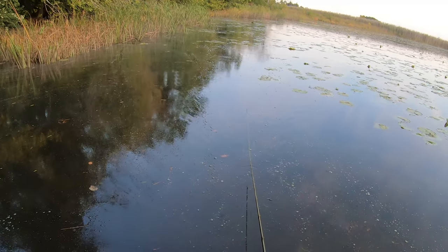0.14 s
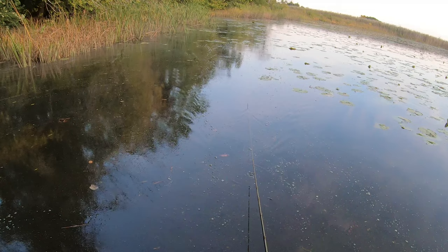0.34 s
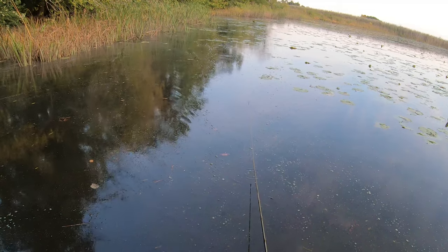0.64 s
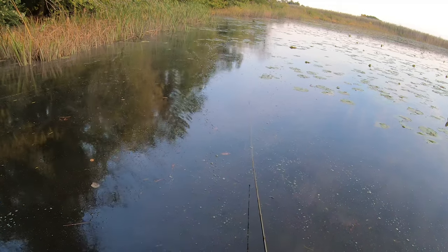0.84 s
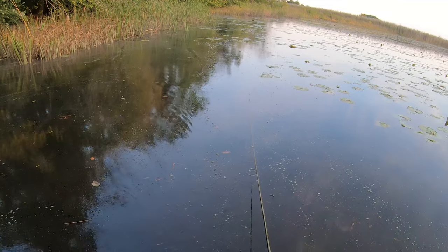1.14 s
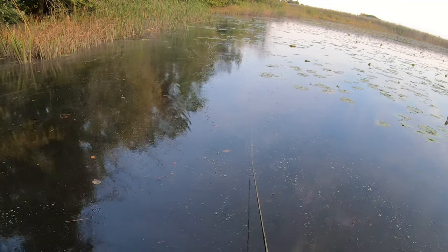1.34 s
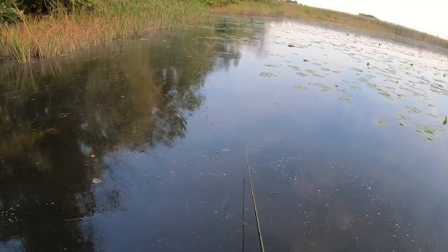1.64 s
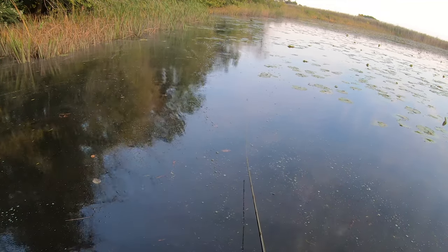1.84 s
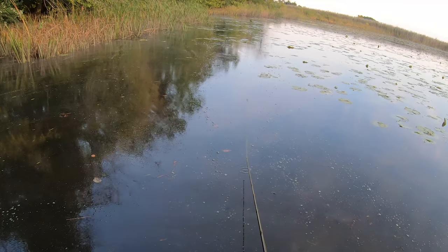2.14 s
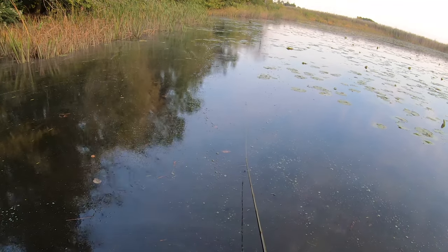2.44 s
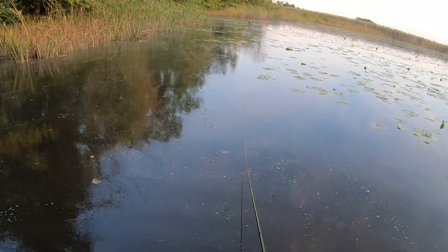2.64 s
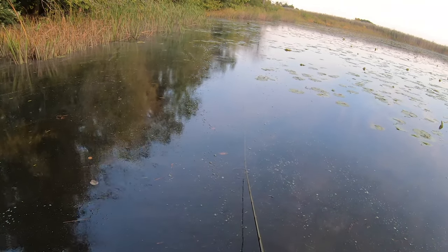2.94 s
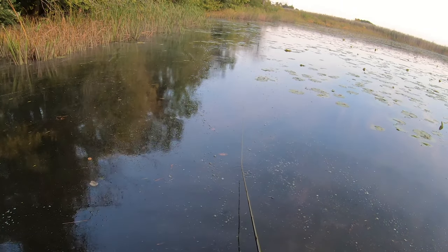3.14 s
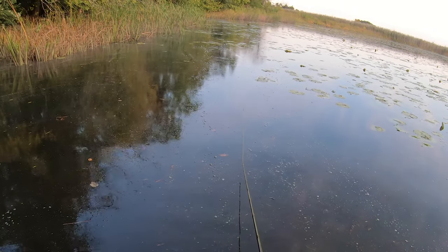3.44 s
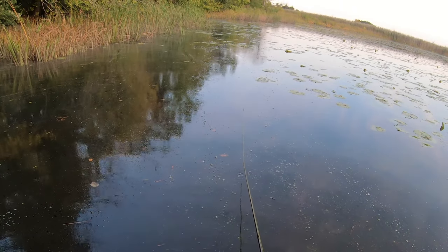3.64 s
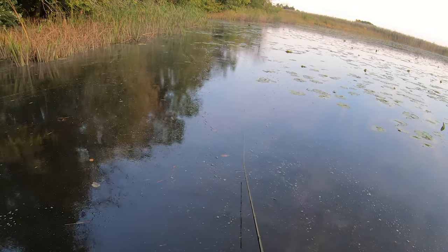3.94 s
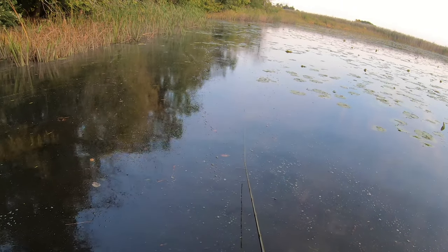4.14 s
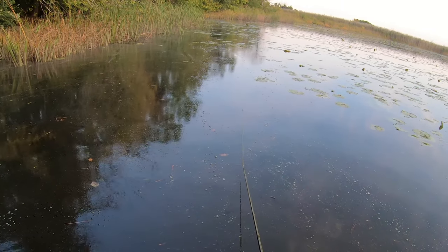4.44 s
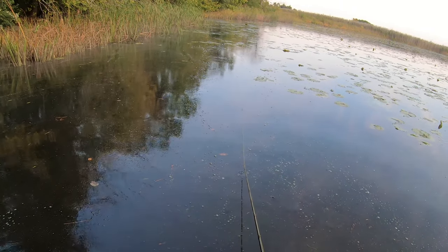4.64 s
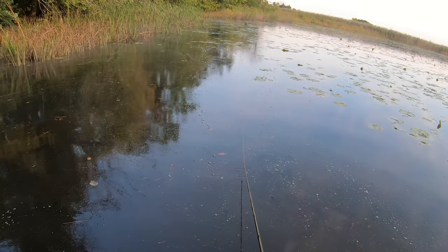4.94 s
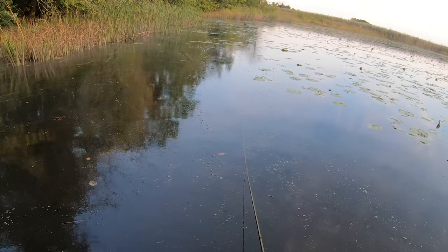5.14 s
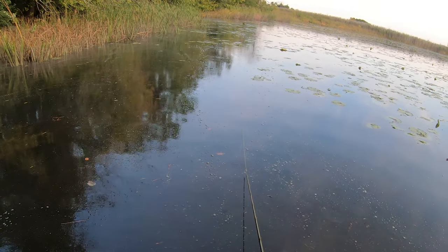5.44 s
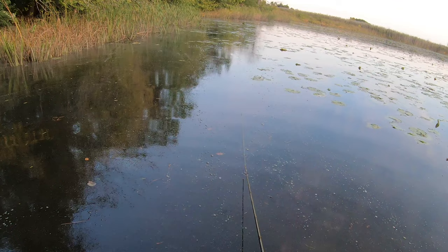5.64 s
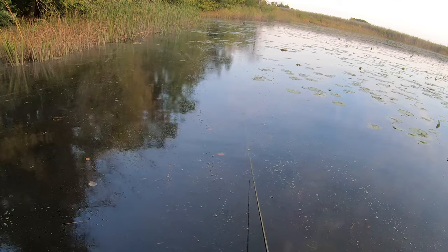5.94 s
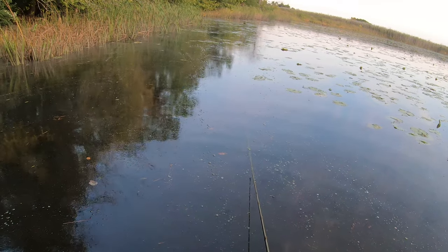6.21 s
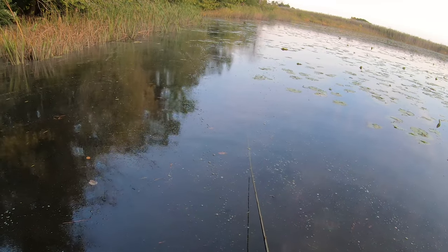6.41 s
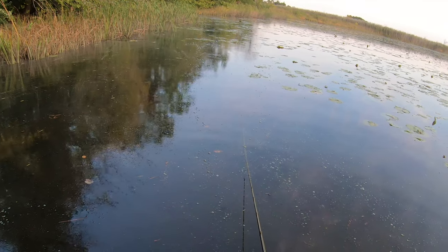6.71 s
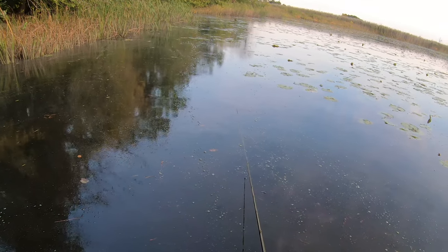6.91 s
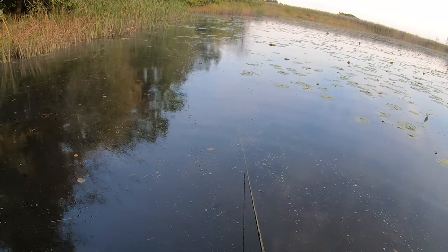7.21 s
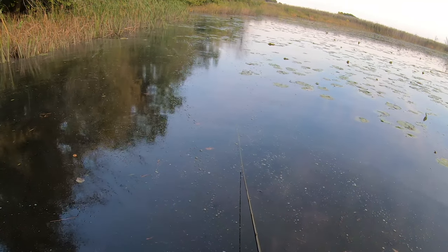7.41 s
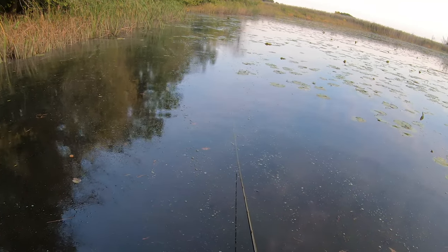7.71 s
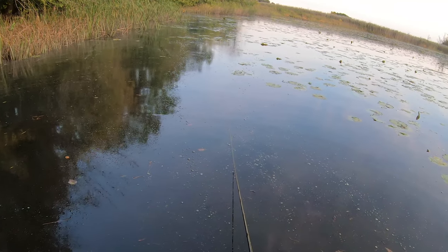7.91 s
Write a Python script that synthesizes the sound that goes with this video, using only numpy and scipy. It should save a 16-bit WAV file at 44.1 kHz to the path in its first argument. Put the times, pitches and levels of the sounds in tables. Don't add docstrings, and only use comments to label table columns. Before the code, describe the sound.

Beside a reedy pond, high crickets trill without pause while lower field crickets chirp in turn. A distant bird gives a falling rattle nearly every second, softened by echoes from the trees. Faint croaks, thin whistles and sharp chips come between. Small hard ticks cluster near two and a half seconds, and wind buffets the left around five. Low road rumble lies beneath, heard in wide stereo on a small camera microphone.

```python
import sys
import numpy as np
from scipy import signal
from scipy.fft import rfft, irfft
from scipy.io import wavfile
from scipy.ndimage import uniform_filter1d

SR = 44100
rng = np.random.default_rng(int(sys.argv[2]) if len(sys.argv) > 2 else 0)


def amplitude_ratio(level_db):
    exponent = np.asarray(level_db, float) / 20
    return 10 ** exponent


def to_wav(s):
    ch = np.atleast_2d(s).T
    pcm = np.round(np.clip(ch, -1, 1) * 32767)
    wavfile.write(sys.argv[1], SR, pcm.astype(np.int16))


N = 355875
T = np.arange(N) / SR
HZ = np.fft.rfftfreq(N, 1 / SR)
SIDE = np.array([[.5], [-.5]])  # left, right share of a pan in dB

# start_s, length_s, pitch_hz, level_db
FIELD_CHIRPS = [(-.02, 0.38, 4320, -61), (.74, 0.28, 4485, -50), (0.801, 0.32, 4405, -56.5),
                (1.92, .27, 4367, -54), (2.15, 0.34, 4526, -53.5), (2.42, .31, 4440, -51.5),
                (3.2, 0.28, 4454, -56.5), (3.33, 0.21, 4320, -59), (3.36, 0.24, 4670, -59.5),
                (3.68, 0.27, 4454, -56.5), (4.12, 0.23, 4510, -56), (4.35, 0.26, 4480, -52.5),
                (4.7, 0.33, 4325, -57), (4.8, 0.31, 4440, -62), (5.2, 0.25, 4565, -57.5),
                (5.45, 0.28, 4460, -59), (5.95, .15, 4400, -57), (6.16, 0.28, 4470, -54.5),
                (6.2, 0.27, 4310, -56), (6.39, 0.26, 4540, -56.5), (6.76, 0.3, 4456, -55.5),
                (7.22, 0.26, 4463, -56), (7.5, 0.33, 4560, -58), (7.85, .28, 4470, -56)]
# start_s, length_s, level_db
HIGH_CHIRPS = [
    (1.465, 0.26, -51),
    (3.125, 0.24, -52.5),
    (4.9, 0.284, -55),
]
# start_s, length_s, level_db
LOW_CHIRPS = [(.1, .3, -68), (1.03, 0.33, -70), (1.9, .25, -72), (2.95, 0.22, -62), (4.15, 0.31, -62),
              (6.25, 0.28, -65), (7.47, .16, -67)]
# start_s, length_s, level_db
CROAKS = [(-.05, 0.24, -60), (.96, 0.22, -62), (1.77, 0.24, -62.5), (2.58, 0.17, -62), (3.39, 0.21, -65),
          (3.72, 0.16, -72), (4.26, 0.2, -60.5), (5.14, 0.22, -64.5), (5.4, 0.16, -70), (5.92, 0.22, -63.5),
          (6.79, 0.28, -64.5), (7.63, 0.22, -63)]
# start_s, level_db, time_stretch
RATTLE_CALLS = [(.1, -54.5, 0.93), (.87, -52.5, 0.85), (1.58, -52, 0.93), (2.47, -53, 0.86),
                (3.27, -53.5, 0.84), (4.09, -53.5, 0.92), (5.04, -56, 0.91), (5.91, -53.5, 0.89),
                (7.0, -54.5, 0.92), (7.791, -55, 0.84)]
# age_s, pitch_hz, level_db
RATTLE_FALL = [(0, 3540, -11.5), (.025, 3480, -5), (.07, 3270, -6), (.15, 3100, -4.5), (.22, 2920, -5),
               (.255, 2645, -6), (.31, 2610, -3.5), (.34, 2560, -17)]
# start_s, length_s, level_db
WHISTLE_NOTES = [(1.35, .115, -59), (1.625, .13, -57), (1.909, 0.1, -56), (2.196, .12, -59.5),
                 (5.508, .11, -60.5), (5.777, .115, -59), (6.061, .12, -57), (6.357, .1, -58)]
# start_s, from_hz, to_hz, level_db, left_minus_right_db
BIRD_CHIPS = [
    (3.738, 8440, 7650, -46.5, 14),
    (4.323, 2830, 3720, -46.5, -9),
    (6.882, 4650, 5300, -54, 0),
    (6.995, 4650, 5340, -55, 2),
    (7.101, 4640, 5500, -56, 2),
    (7.217, 5000, 5900, -58, 6),
    (7.32, 4800, 5600, -55, 1),
]
# start_s, length_s, pitch_hz, level_db, left_minus_right_db
BURRED_NOTES = [
    (.805, 0.024, 3070, -56, -7),
    (3.0, 0.031, 2960, -62, 0),
    (.63, 0.12, 3000, -62.5, -3),
    (6.95, .05, 1950, -61, -6),
    (4.215, .03, 3600, -55, -2),
    (7.682, 0.031, 3050, -50.5, -5),
]
# start_s, length_s, from_hz, to_hz, level_db
BUBBLE_NOTES = [
    (7.473, 0.0223, 2300, 3970, -53),
    (7.491, 0.0106, 2860, 4010, -44),
    (7.563, 0.031, 2320, 3920, -54),
]
# start_s, peak_db, ring_hz, left_minus_right_db
TICK_HITS = [(.700, -36, 2240, -3), (1.724, -49, 3600, 6), (2.4305, -32.5, 1250, -17),
             (2.437, -31, 700, -14), (2.533, -28.5, 3300, 1.5), (3.223, -38, 5640, 3),
             (4.218, -39, 2200, 6), (6.778, -49, 5000, -1), (6.1965, -26, 2600, -7),
             (7.1977, -28, 1733, -7.5), (7.415, -38, 1810, -1), (7.99, -39, 1899, -6)]
# start_s, held_s, level_db
WIND_GUSTS = [
    (4.97, 0.46, -23.5),
    (5.45, .2, -36),
    (6.6, .17, -38.5),
]
# freq_hz, density_db_per_hz
ROAD_SPECTRUM = [(12, -37.5), (20, -23), (59, 1), (111, -2.5), (146, 0.5), (221, -7.5), (260, -15.5),
                 (295, -14.5), (329, -20.5), (360, -22.5), (447, -30.5), (555, -34), (742, -24), (972, -31),
                 (1500, -37), (1950, -51), (3300, -120)]
# centre_hz, width_hz, level_db
ENGINE_DRONES = [
    (303, 18, -56.5),
    (356.5, 8.6, -56),
]
# freq_hz, density_db_per_hz
CHORUS_SPECTRUM = [(900, -39.5), (1200, -10), (2040, -15.5), (3430, -15), (3800, -11), (4380, -2),
                   (5580, -14.5), (6470, -3.5), (7300, -7), (8300, -8.5), (8480, -14), (8850, -27),
                   (9400, -35), (9800, -51.5)]
# time_s, level_db
ROAD_HAZE = [(0, -1), (1.3, -0.5), (2.4, 3), (3.2, 0), (4, -1), (6.2, -2), (6.8, 0.5), (8.07, 1.5)]
# freq_hz, shared_fraction
PORT_LIKENESS = [(60, .96), (120, .98), (250, .94), (400, .8), (520, .3), (1000, .35), (2200, .45),
                 (4500, .4), (9000, .5)]
# freq_hz, left_lead_rad
PORT_LEAD = [(1, 0), (350, -.2), (520, -1.2), (950, -3.3), (1550, -3.6), (1900, -6), (2600, -6.5),
             (4300, -5.7), (5250, -4.6), (7150, -4), (8300, -2.5)]
# freq_hz, left_minus_right_db
PORT_TILT = [(60, 1), (100, -1), (180, -0.5), (320, -0.5), (560, -1), (980, -4.5), (1710, -1.5), (2980, -2),
             (5210, 4), (9110, -1)]
# start_s, length_s, highest_hz
TREBLE_FLICKERS = [(.02, .06, 10300), (.17, .05, 10500), (.62, .13, 10800), (.9, .11, 10600),
                   (1.11, .08, 11800), (1.37, .05, 10100), (1.69, .06, 11000), (2.05, .08, 12500),
                   (2.13, .16, 10200), (2.49, .07, 10500), (2.76, .08, 10500), (2.9, .1, 10900),
                   (3.17, .04, 10800), (3.5, .11, 11000), (3.8, .08, 10200), (3.99, .25, 10600),
                   (4.58, .21, 10400), (4.85, .18, 10600), (5.07, .12, 11100), (5.4, .1, 10300),
                   (5.55, .08, 12200), (5.75, .04, 10100), (6.08, .08, 10200), (6.26, .21, 11200),
                   (6.5, .55, 11000), (6.75, .32, 12900), (7.16, .06, 10200), (7.6, .13, 10200),
                   (7.82, .25, 10800)]


def level(x, db):
    return x * amplitude_ratio(db) / np.sqrt(np.mean(x ** 2))


def curves(rows, at=T):
    s, *columns = np.transpose(rows)
    return [np.interp(at, s, c) for c in columns]


def over_hz(rows):
    hz, value = np.transpose(rows)
    return np.interp(np.log(HZ + 1), np.log(hz + 1), value)


def walk(rate_hz):
    k = int(SR / rate_hz)
    held = np.repeat(rng.standard_normal(N // k + 1), k)
    return 1.3 * uniform_filter1d(uniform_filter1d(held, k), k)[:N]


def tone(hz):
    return np.sqrt(2) * np.sin(2 * np.pi * np.cumsum(hz) / SR)


def trill(strokes, hz, sweep_hz, duty, scatter_db, detune):
    whole, part = np.divmod(strokes, 1)
    size, pitch = rng.standard_normal((int(whole.max()) + 1, 2))[whole.astype(int)].T
    gate = np.sin(np.pi * np.clip(part / duty, 0, 1))
    note_hz = hz * (1 + detune * pitch) + sweep_hz * (.5 - part / duty)
    return gate * amplitude_ratio(scatter_db * size) * tone(note_hz) / np.sqrt(duty / 2)


def arch(strokes, top_hz, depth_hz, crest, half, scatter_db):
    whole, part = np.divmod(strokes, 1)
    bow = np.clip((part - crest) / half, -1, 1)
    size = rng.standard_normal(400)[whole.astype(int)]
    return (1 - bow ** 4) * amplitude_ratio(scatter_db * size) * tone(top_hz - depth_hz * bow ** 2 + 8 * walk(20))


def bursts(rows):
    gain = 0
    for start_s, length_s, db in rows:
        to_edge_s = np.minimum(T - start_s, start_s + length_s - T)
        gain = gain + amplitude_ratio(db) * np.clip(to_edge_s / 0.013, 0, 1)
    return gain


def place(x, pan_db, lag, wet_db, t60):
    t = T[:int(t60 * SR)]
    tail = rng.standard_normal((2, 2 * SR))[:, :len(t)] * amplitude_ratio(-60 * t / t60) * (t > .003)
    tail = tail / np.sqrt(np.sum(tail ** 2) / 2)
    echo = signal.fftconvolve(x[None], tail, axes=1)[:, :N]
    late = irfft(rfft(x) * np.exp(-2j * np.pi * HZ * lag / SR), N)
    return (np.array([x, late]) + amplitude_ratio(wet_db) * echo) * amplitude_ratio(SIDE * pan_db)


def hiss(gain):
    shared, left, right = rfft(rng.standard_normal((3, N)))
    alike = np.clip(over_hz(PORT_LIKENESS), 0, 1)
    turn = amplitude_ratio(over_hz(PORT_TILT) / 2) * np.exp(.5j * over_hz(PORT_LEAD))
    pair = np.sqrt(alike) * shared + np.sqrt(1 - alike) * np.array([left, right])
    return irfft(pair * gain * np.array([turn, 1 / turn]), N)


def reed_crickets():
    near = arch(.85 + 41.16 * T, 8370, 900, 0.546, 0.37, 0.98) * amplitude_ratio(-52)
    neighbour = arch(1.83 + 39.48 * T, 7905, 380, .48, .28, 1.2) * amplitude_ratio(-53)
    band = np.zeros(N)
    for strokes_per_s, hz, db in [(34.0, 6640, -62.0), (32.1, 6450, -66), (36.2, 6200, -64.5),
                                  (31.47, 6900, -66.0), (37.5, 7150, -66.5), (43.14, 7600, -63.5)]:
        strokes = (strokes_per_s + .4 * walk(.5)) * T + 9
        band += trill(strokes, hz, 450, .8, 1.1, .018) * amplitude_ratio(db + 1.5 * walk(1.5))
    out = place(near, 3.6, 1.85, -9.0, 0.12)
    out = out + place(neighbour, 3.7, 4.02, -3, 0.18)
    return out + place(band, 3, 4.2, 3.95, 0.34)


def strokes_at(rate_hz, wobble_hz):
    return np.cumsum(rate_hz + wobble_hz * walk(6)) / SR


def field_chirps():
    out = trill(strokes_at(49.4, 3), 4396 + 60 * walk(3), 250, .7, 2.6, .015) * amplitude_ratio(-62.5 + 2.1 * walk(2.7))
    for start_s, length_s, hz, db in FIELD_CHIRPS:
        on = (T > start_s) & (T < start_s + length_s)
        age_s = T[on] - start_s
        edge = np.clip(np.minimum(age_s, length_s - age_s) / 0.016, 0, 1)
        strokes = np.minimum(41 * age_s, 19.9)
        out[on] += edge * amplitude_ratio(db) * trill(strokes, hz, 188.5, .9, 1.97, 0.00597)
    return place(out, 1.6, 1.0, -.4, 0.3)


def high_cricket():
    out = trill(strokes_at(43.44, .6), 4810, 220, .75, 1.9, 0.00586) * bursts(HIGH_CHIRPS)
    return place(out * 1.06, 5.5, 2.3, -2.0, 0.25)


def low_cricket():
    out = trill(strokes_at(56.45, 3) * .87, 3990 + 70 * walk(2.5), 300, .7, 3.1, .025)
    return place(out * (bursts(LOW_CHIRPS) + amplitude_ratio(-71)), 1.5, .8, 1.5, 0.26)


def croaker():
    out = trill(strokes_at(37.87, 4), 1755 + 12 * walk(9), 200, .8, 2.6, 0.0118) * bursts(CROAKS)
    return place(out * 0.74, 7.3, 2.6, 5.2, 0.23)


def rattle_bird():
    out = np.zeros(N)
    for start_s, db, stretch in RATTLE_CALLS:
        age_s = (T - start_s) / stretch
        hz, shape_db = curves(RATTLE_FALL, age_s)
        strokes = np.clip(62 * age_s - 48 * age_s ** 2, 0, 25)
        flicks = trill(strokes, hz, 640 - 1500 * age_s, .66, 2.35, .02)
        out += flicks * amplitude_ratio(db + shape_db) * (age_s > 0) * (age_s < .34)
    slap_s, slap_db = .092, -6
    out = out + amplitude_ratio(slap_db) * np.interp(T - slap_s, T, out)
    return place(out, .1, .3, -4.5, .7) + amplitude_ratio(-12.0) * place(out, .1, .3, 14.3, 0.3)[0]


def whistles():
    out = np.zeros(N)
    for start_s, length_s, db in WHISTLE_NOTES:
        part = np.clip((T - start_s) / length_s, 0, 1)
        hz = 2650 - 240 * np.exp(-part / .12) - 90 * part ** 12 + 12 * walk(40)
        out += np.sin(np.pi * part) ** 0.18 * amplitude_ratio(db) * tone(hz)
    return place(out, .2, .4, -7, 0.25)


def chips_and_burrs():
    out = np.zeros((2, N))
    for start_s, from_hz, to_hz, db, pan_db in BIRD_CHIPS:
        part = np.clip((T - start_s) / .031, 0, 1)
        out += np.sin(np.pi * part) * tone(from_hz + (to_hz - from_hz) * part) * amplitude_ratio(db + SIDE * pan_db)
    for start_s, length_s, hz, db, pan_db in BURRED_NOTES:
        part = np.clip((T - start_s) / length_s, 0, 1)
        burr = trill(130 * length_s * part, hz, -500, 0.84, 2.4, 0.04)
        out += np.sin(np.pi * part) ** 0.36 * burr * amplitude_ratio(db + SIDE * pan_db)
    return out + amplitude_ratio(-10.5) * place(out.mean(0), .1, .2, 10.3, 0.21)


def bubbles():
    out = np.zeros(N)
    for start_s, length_s, from_hz, to_hz, db in BUBBLE_NOTES:
        part = np.clip((T - start_s) / length_s, 0, 1)
        hz = to_hz - (to_hz - from_hz) * np.exp(-part / 0.22)
        out += np.sin(np.pi * part) * amplitude_ratio(db) * tone(hz)
    return place(out, 1.5, .3, -2, .12)


def ticks():
    out, t = np.zeros((2, N)), T[:1500]
    for start_s, db, hz, pan_db in TICK_HITS:
        ring = np.sin(2 * np.pi * hz * t) * np.exp(-t / 0.00072) * (1 - np.exp(-t / .00015))
        scatter = signal.fftconvolve(rng.standard_normal(1500) * np.exp(-t / 0.0056), ring)[:1500]
        i = int(start_s * SR)
        out[:, i:i + 1500] += (ring + 0.055 * scatter) * amplitude_ratio(db + SIDE * pan_db)
    return out


def wind():
    high_pass = (HZ / 22) ** 2 / (1 + (HZ / 22) ** 2)
    low_pass = 1 / (1 + (HZ / 105) ** 4.97)
    buffet = irfft(rfft(rng.standard_normal((2, N))) * high_pass * low_pass, N)
    rise_db_s, fall_db_s, breeze_db = 160, 230, -60.5
    gain = amplitude_ratio(breeze_db)
    for start_s, held_s, db in WIND_GUSTS:
        before_s = np.clip(start_s - T, 0, None)
        after_s = np.clip(T - start_s - held_s, 0, None)
        gain = gain + amplitude_ratio(db - rise_db_s * before_s - fall_db_s * after_s)
    return level(buffet, 0) * gain * amplitude_ratio(np.array([[5], [-12]]) + 1.0 * walk(14))


def engine_drones():
    return sum(level(hiss(1 / np.hypot(1, 2 * (HZ - hz) / width_hz)), db) for hz, width_hz, db in ENGINE_DRONES)


def road_and_chorus():
    road = level(amplitude_ratio(over_hz(ROAD_SPECTRUM)), -33.5)
    chorus = level(amplitude_ratio(over_hz(CHORUS_SPECTRUM)), -48.5)
    colour = np.hypot(road, chorus)
    octave = np.log2(HZ / 30 + 1e-9)
    out = np.zeros((2, N))
    for k in range(10):
        band = np.sqrt(np.clip(1 - abs(octave - k), 0, 1))
        swell_db = 0.45 * walk(1.544) + 1.14 * walk(9)
        if k == 6:
            swell_db = swell_db + curves(ROAD_HAZE)[0]
        out += hiss(colour * band) * amplitude_ratio(swell_db)
    return out


def treble_flickers():
    hop = 1024
    at_s = (np.arange(N // hop + 2) * hop - 44) / SR
    reach_hz = np.max([hz * (at_s > start_s) * (at_s < start_s + length_s)
                       for start_s, length_s, hz in TREBLE_FLICKERS], axis=0)
    floor_hz = 8800 + 140 * rng.standard_normal(len(at_s))
    reach_hz = np.maximum(reach_hz * (rng.random(len(at_s)) < .68), floor_hz)
    out = np.zeros((2, N))
    for k in range(16):
        lo_hz = 8640 + 260 * k
        chance = rng.random(len(at_s))
        flickering = (lo_hz < reach_hz) & (chance < .78 - .03 * k)
        stray = (chance < .035) & (k < 7)
        steps = np.repeat((flickering | stray) * amplitude_ratio(-78.0 - 1.27 * k), hop)
        gain = uniform_filter1d(steps, 400)[556:N + 556]
        band = 1. * (HZ >= lo_hz) * (HZ < lo_hz + 260)
        out += level(hiss(band)[0], 0) * gain
    return out


def scene():
    crickets = reed_crickets() + field_chirps() + high_cricket() + low_cricket()
    animals = crickets + croaker() + rattle_bird() + whistles() + chips_and_burrs()
    return animals + bubbles() + ticks() + wind() + engine_drones() + road_and_chorus()


def band_limit(x):
    return signal.sosfilt(signal.butter(12, 12900, fs=SR, output="sos"), x)


def record(dry):
    mix = irfft(rfft(dry) * (HZ < 8640), N) + treble_flickers()
    return band_limit(mix)


dry = scene()
out = record(dry)
to_wav(out)
```